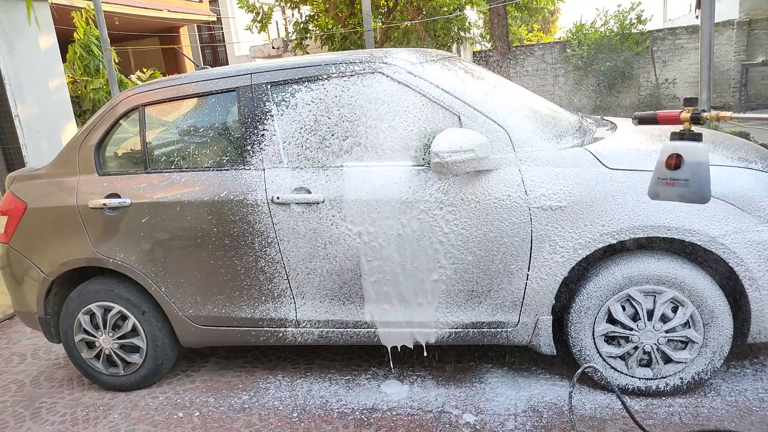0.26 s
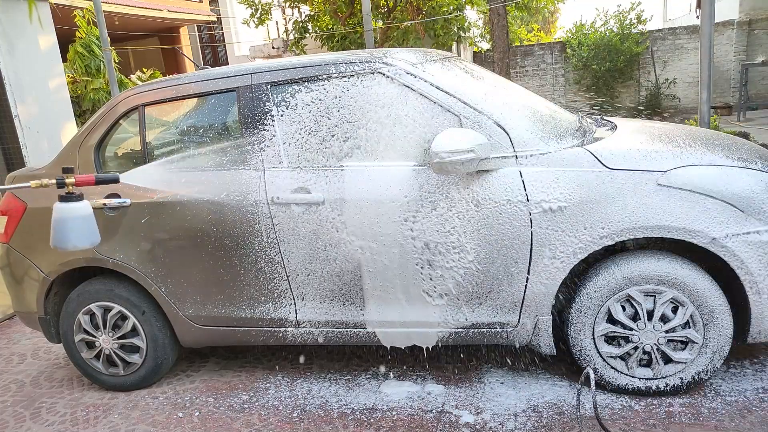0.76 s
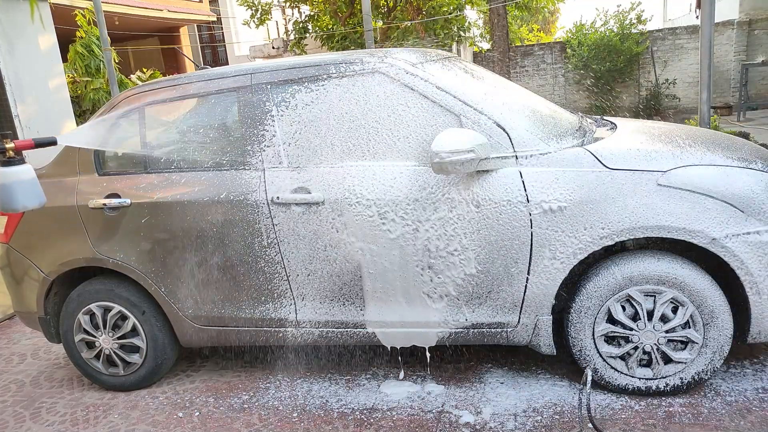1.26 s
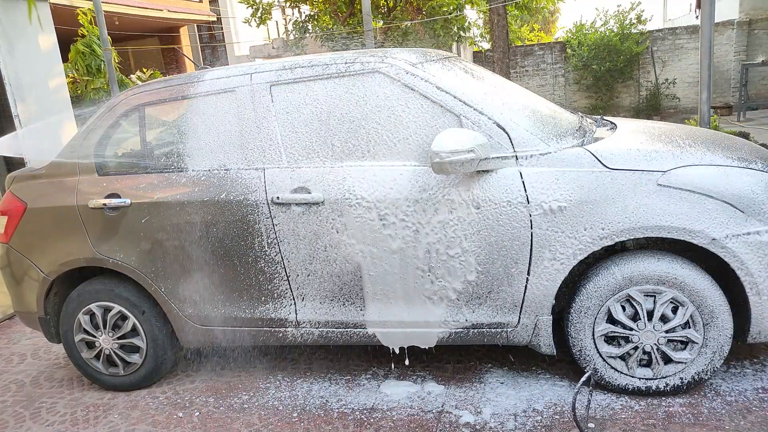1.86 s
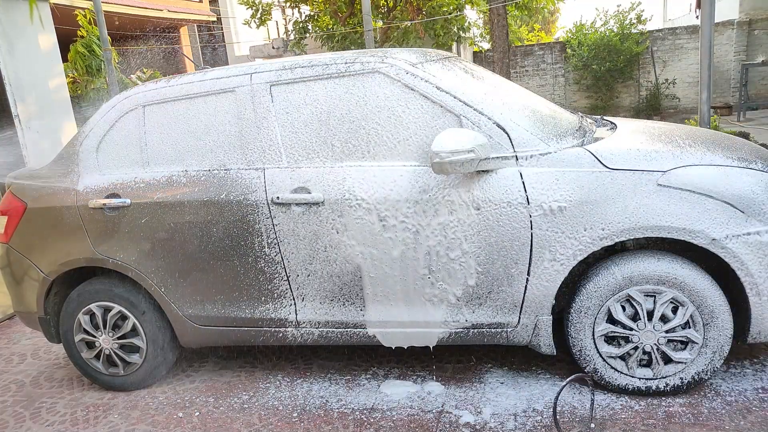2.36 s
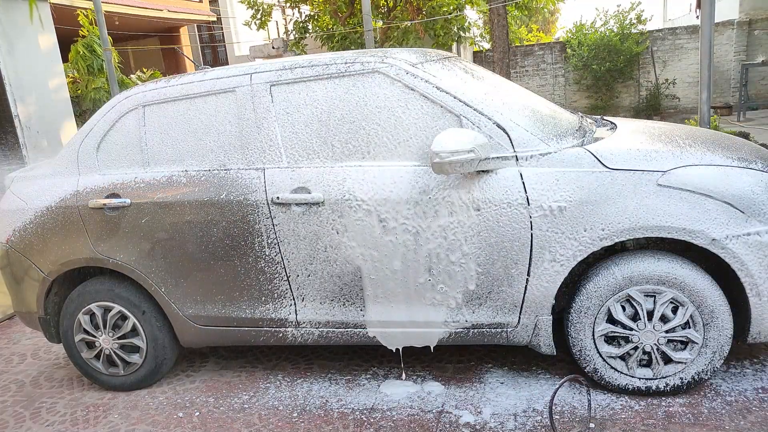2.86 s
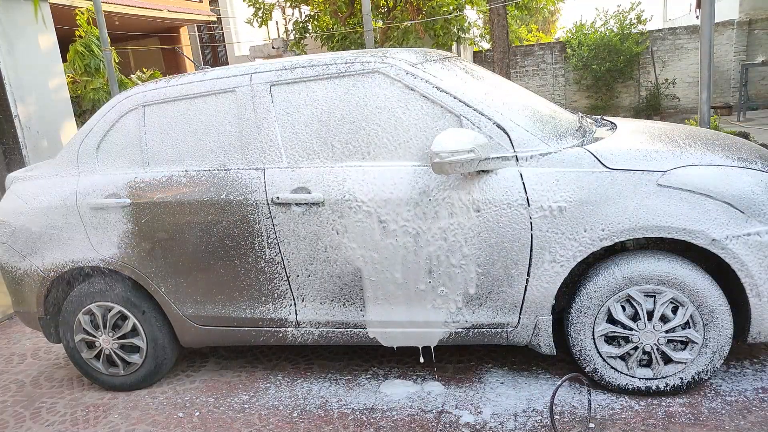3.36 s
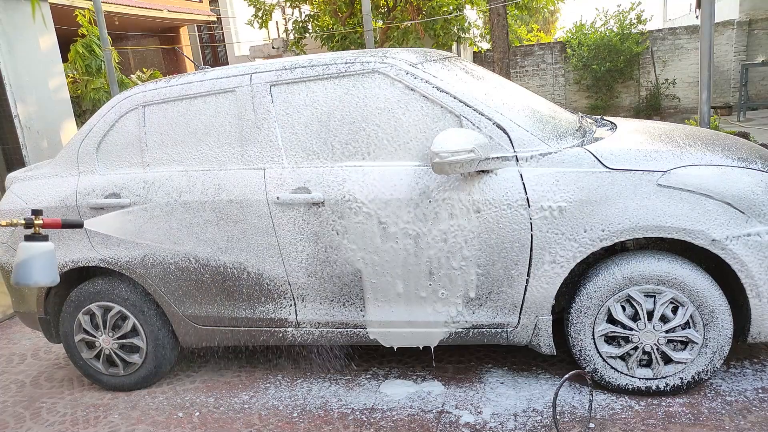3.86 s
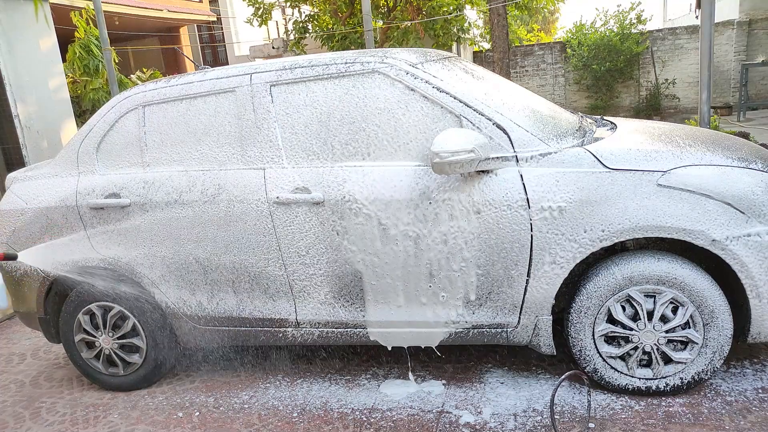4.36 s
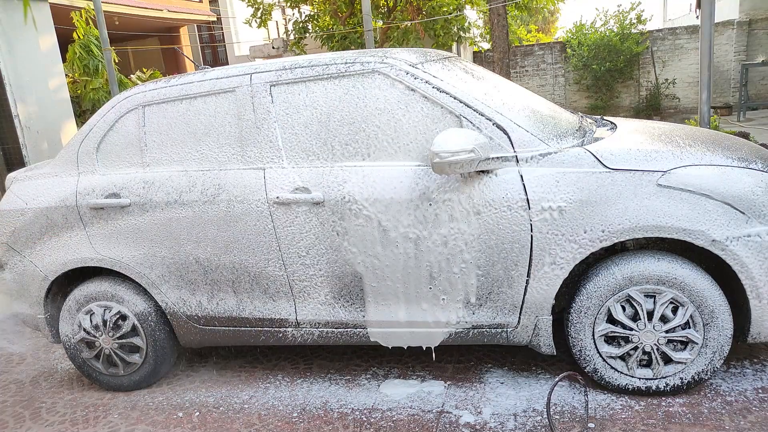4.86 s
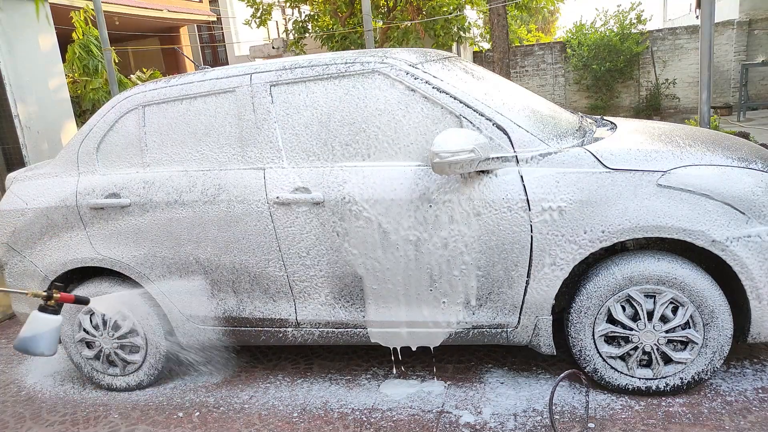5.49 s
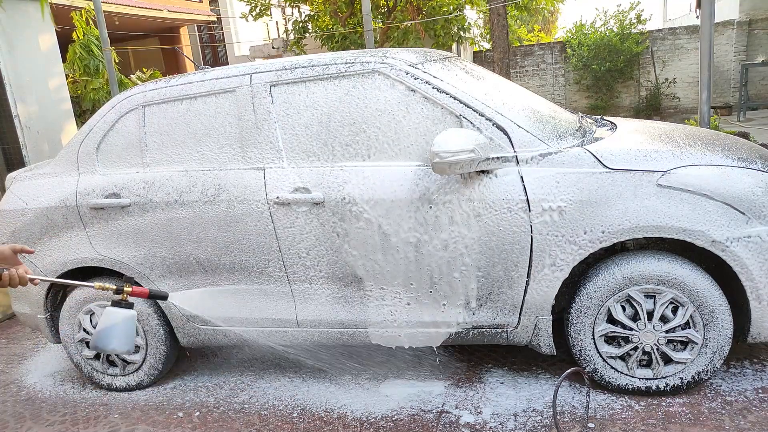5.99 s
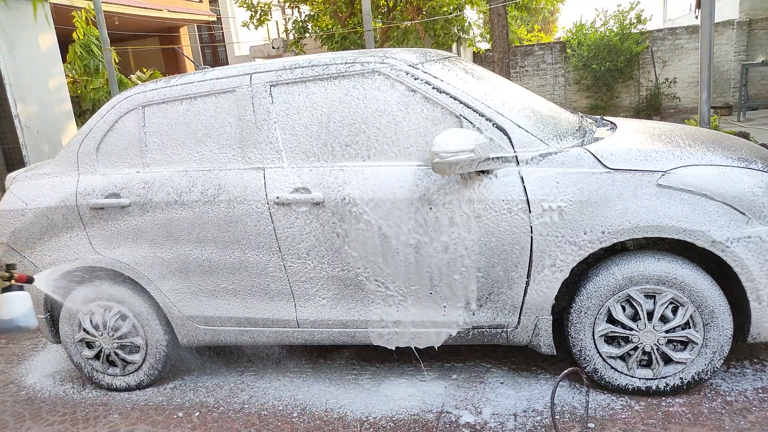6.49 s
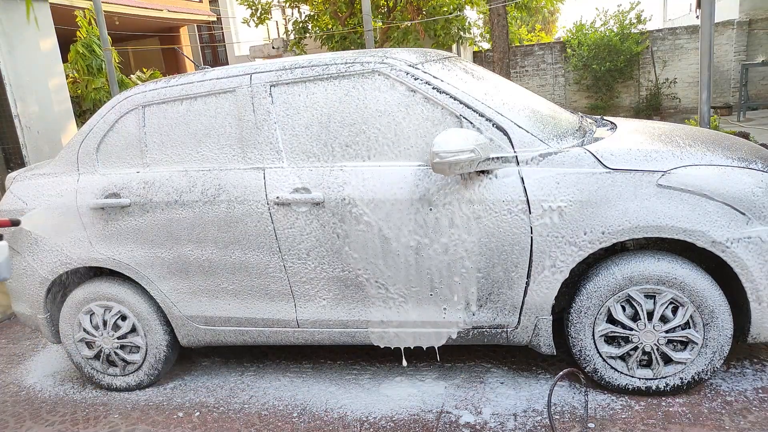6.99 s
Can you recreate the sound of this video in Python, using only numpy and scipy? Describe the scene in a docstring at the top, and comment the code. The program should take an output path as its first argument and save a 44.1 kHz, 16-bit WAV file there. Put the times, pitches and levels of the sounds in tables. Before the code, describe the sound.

A pressure washer sprays foam on a car with a loud, bright hiss, cutting out briefly at the start over whining motor noise

```python
"""Pressure washer spraying foam on a car

An electric washer sprays a car in a yard; early on the trigger is let go briefly, then squeezed again.
The jet is bands of noise that sputter, glide and echo off the car as the lance sweeps along the panels.
Random clicks make drops spatter on the car, and single hard drops ping as short tones.
The motor and pump whine as tones tied to the shaft, over housing noise, mains hum and a gusty yard.
"""
import sys
import numpy as np
from scipy import signal
from scipy.fft import rfft, irfft, next_fast_len
from scipy.io import wavfile
from scipy.ndimage import uniform_filter1d, map_coordinates

SR = 44100
rng = np.random.default_rng(int(sys.argv[2]) if len(sys.argv) > 2 else 0)


def master(y):
    """Save y as 16-bit WAV."""
    cut = np.clip(np.atleast_2d(y).T, -1, 1)
    pcm = np.round(cut * 32767)  # scale
    wavfile.write(sys.argv[1], SR, pcm.astype(np.int16))


N = 318843  # length in samples

# In every spectrum table, shape_db is only a shape: the noise is then scaled to rms 1.
# The slowly changing band levels are set before a small fixed trim where they are played.

# the running jet briefly surges, or dips where rise_db is negative: time_s, length_s, rise_db
SURGES_AND_DIPS = [(1.1, 0.052, -1), (3.33, 0.079, 1), (3.56, 0.074, 1.5), (4.0, 0.011, 2.5),
                   (4.35, 0.05, 1), (4.585, 0.0059, 2.5), (5.362, 0.0049, 3)]


def spray():
    """The turbulent jet sputters as air and soap mix, and its drops strike the car."""
    sputter = amp(0.45 * wobble(25) + 0.28 * wobble(140) + 0.28 * wobble(900))
    jet = jet_body() + resonances() + cavities() + sizzle()
    sound = jet * sputter + spatter()
    return notched(amp(swells(SURGES_AND_DIPS)) * sound, width_hz=440)


# shapes of the hollow, splash and hiss bands and of the dull roar: pitch_hz, shape_db (dB per Hz)
HOLLOW_SHAPE = [(500, -43.5), (900, -10.5), (1300, -18), (1470, -12.5), (1750, 3), (2000, 1.5),
                (2250, -15.5), (3000, -36.5)]
SPLASH_SHAPE = [(1200, -26), (2100, -1.5), (2600, 3.5), (3400, 4), (3900, 2), (5000, -21)]
HISS_SHAPE = [(2600, -27), (3300, -15), (3750, -6), (4050, -4), (4300, -1), (4550, -1), (4900, -2),
              (5250, -7), (6500, -33.5)]
ROAR_SHAPE = [(800, -12), (1000, 0), (1270, -3), (1550, 1.5), (2500, -2.5), (5000, -22.5)]
ROAR_DB = -38
# loudness of the splash band while the jet runs: time_s, level_db
SPLASH_LEVEL = [(0.5, -32.5), (0.62, -30), (1.71, -29.5), (2.46, -32.5), (2.87, -30.5), (3.11, -35),
                (3.22, -30.5), (3.5, -34), (3.65, -29), (4.36, -32.5), (4.92, -35), (5.48, -28.5),
                (5.7, -31), (5.82, -29), (6.12, -27.5), (6.82, -33), (7.2, -30.5)]
# the splash on the panels returns slowest; drops in flight keep splashing after the release
SPLASH_FILL_S, FLIGHT_S = 0.056, 0.039
HOLLOW_CENTRE_HZ, HISS_CENTRE_HZ = 1820, 4607


def jet_body():
    """Turbulent noise bands; longer waves pick up shifting reflections, while the roar stays plain."""
    hollow = jet_band(HOLLOW_SHAPE, hollow_level() - 2.0)
    hollow = shifted(hollow, low_pitch() - HOLLOW_CENTRE_HZ)
    splash_db = curves(SPLASH_LEVEL)[0] + valve(FOAM_LACK_DB, SPLASH_FILL_S, EMPTY_DB, FLIGHT_S)
    splash = jet_band(SPLASH_SHAPE, splash_db + 0.4)
    hiss = jet_band(HISS_SHAPE, hiss_level() - 1.0)
    hiss = shifted(hiss, high_ring_curves()[0] - HISS_CENTRE_HZ)
    roar = jet_band(ROAR_SHAPE, ROAR_DB + foam_flow())
    return reflected(hollow + splash + hiss, sway=0.03) + roar


def jet_band(spectrum, db):
    """One coloured noise band of the jet, its level unsteady like the turbulent flow."""
    return amp(db + 0.66 * wobble(18)) * noise(spectrum)


# loudness of the hollow band, which changes with the jet's aim: time_s, level_db
HOLLOW_LEVEL = [(0.04, -31), (0.12, -37), (0.5, -33.5), (0.53, -28), (0.95, -27), (1.43, -31.5),
                (2.08, -29), (2.14, -31.5), (2.33, -31.5), (2.35, -32), (3.19, -34.5), (3.99, -26.5),
                (4.03, -23), (4.05, -29.5), (4.38, -27), (4.49, -33.5), (4.88, -31.5), (4.97, -28),
                (5.08, -32.5), (5.43, -32), (5.58, -26), (5.84, -28), (6.25, -23.5), (6.26, -26.5),
                (6.6, -29), (6.81, -34), (6.84, -30), (7.2, -29.5)]


def hollow_level():
    """Hollow band level in dB, following the aim and the foamy flow."""
    return curves(HOLLOW_LEVEL)[0] + foam_flow()


# loudness of the hiss band: time_s, level_db
HISS_LEVEL = [(0.07, -24), (0.13, -27), (0.34, -24), (0.52, -24), (0.72, -29.5), (0.86, -24), (1.8, -22),
              (2.3, -24.5), (2.75, -32.5), (2.89, -27), (2.96, -24), (3.25, -22.5), (3.48, -22),
              (3.7, -21.5), (4.0, -20.5), (4.4, -20), (4.7, -22), (4.97, -26.5), (5.04, -21), (5.12, -25.5),
              (5.38, -22), (5.62, -27), (5.8, -25), (6.02, -24), (6.12, -29), (6.185, -30), (6.205, -20.5),
              (6.55, -22), (6.72, -21.5), (7.07, -20), (7.2, -21)]


def hiss_level():
    """Hiss band level in dB, following its table and the quickly recovering treble."""
    return curves(HISS_LEVEL)[0] + valve(TREBLE_LACK_DB, TREBLE_FILL_S, EMPTY_DB)


# loudness of the top sizzle as the lance is swept about: time_s, level_db
SIZZLE_LEVEL = [(0.5, -23.5), (0.78, -22.5), (0.89, -20), (0.95, -23), (1.04, -18), (1.94, -16),
                (2.78, -17.5), (2.81, -18.5), (2.89, -23), (3.02, -18.5), (3.82, -17.5), (3.99, -15.5),
                (4.55, -16), (4.59, -14.5), (4.64, -19.5), (5.09, -22.5), (5.22, -16.5), (5.33, -20.5),
                (5.37, -15), (5.39, -17), (5.72, -20), (5.76, -23), (6.04, -19.5), (6.1, -22), (6.28, -16),
                (6.6, -21.5), (6.99, -16.5), (7.2, -16.5)]
DRIBBLE_DB, MIST_S = -26.5, 0.016  # floor in the pause; extra time the fine mist sizzles


def sizzle_level():
    """Top sizzle level in dB; the mist lingers, then the flow sinks to a dribble."""
    return curves(SIZZLE_LEVEL)[0] + valve(TREBLE_LACK_DB, TREBLE_FILL_S, DRIBBLE_DB, MIST_S)


# the low resonance as the lance turns: time_s, pitch_hz
LOW_RING = [(0.05, 1880), (0.5, 1800), (0.95, 1810), (1.5, 1845), (2.1, 1875), (2.6, 1900), (3.8, 1820),
            (4.45, 1845), (5, 1715), (5.3, 1820), (5.65, 1790), (6.05, 1750), (6.25, 1790), (6.55, 1830),
            (7.2, 1835)]


def low_pitch():
    """Pitch of the jet's low resonance in Hz, which also carries the hollow band."""
    return curves(LOW_RING)[0]


# the high resonance follows the aim: time_s, pitch_hz, level_db (relative to the hiss)
HIGH_RING = [(0.45, 4580, -10.5), (0.75, 4720, -7), (1.05, 4563, -7), (1.8, 4845, -6), (2.2, 4879, -12),
             (2.55, 5000, -10), (2.85, 4877, -19), (2.97, 4536, 1), (3.2, 4520, -14), (3.6, 4703, -7.5),
             (4.05, 4597, -5.5), (4.36, 4728, -12), (4.72, 4510, -11), (4.95, 4670, -6.5), (5.4, 4617, -8),
             (5.65, 4528, 1), (5.8, 4546, -3.5), (6.03, 4550, -2), (6.3, 4560, -1), (6.63, 4497, -6),
             (7.2, 4523, -4)]


def high_ring_curves():
    """Pitch in Hz, which also carries the hiss band, and relative level in dB of the high resonance."""
    return curves(HIGH_RING)


WANDER_HZ = 40.2  # scale of the high resonance's random drift


def resonances():
    """Turbulence excites two narrow, gliding resonances with random strength and phase."""
    high_hz, whistle_db = high_ring_curves()
    low_db = hollow_level() - 6.0 + 2.3 * wobble(16)
    high_db = hiss_level() + whistle_db - 4.5 + 1.8 * wobble(15)
    low = amp(low_db) * ring(low_pitch(), flutter=100)
    high = amp(high_db) * ring(high_hz + WANDER_HZ * wobble(9), flutter=400)
    return low + high


# recesses of the doors and the wheel ring: start_s, end_s, first_hz, last_hz, level_db (mid-pass)
CAVITIES = [(0.387, 1.1, 1490, 1480, -39), (0.523, 0.78, 2600, 2610, -36), (1.031, 1.165, 3780, 3890, -25),
            (1.212, 1.487, 1420, 1440, -43), (1.721, 1.864, 4990, 4890, -27.5),
            (2.547, 2.719, 3380, 3210, -37), (2.68, 3.0, 2844, 2830, -36),
            (2.938, 3.199, 4500, 4540, -30.5), (3.215, 3.396, 4050, 3920, -30),
            (3.461, 3.583, 4950, 4900, -27.5), (4.301, 4.418, 4860, 4900, -26.5),
            (5.468, 5.717, 1610, 1550, -39.5), (5.86, 6.187, 2740, 2510, -32),
            (5.96, 6.238, 1640, 1640, -35.5), (6.198, 6.278, 4420, 4460, -27),
            (6.748, 6.95, 3800, 3810, -35), (7.0, 7.16, 4400, 4450, -26)]


def cavities():
    """Recesses of the car ring while the jet plays on them, rising and fading as it passes."""
    t = np.arange(N) / SR
    sound = np.zeros(N)
    for start, end, first_hz, last_hz, db in CAVITIES:
        u = np.clip((t - start) / (end - start), 0, 1)
        swell = 2 * np.sqrt(u * (1 - u))
        sound += amp(db) * swell * ring(first_hz + u * (last_hz - first_hz), flutter=120)
    return sound


# shape of the top sizzle: pitch_hz, shape_db (dB per Hz)
SIZZLE_SHAPE = [(4000, -18.5), (5200, -9.5), (5800, -1), (6300, 3), (6900, 2), (7400, -2.5), (7750, -8.5),
                (8000, -26.5), (8300, -24.5), (8550, -57.5)]
BRIGHTEN_HZ_PER_DB = 14


def sizzle():
    """The finest spray comes from the whole fan; its noise slides up in pitch as it grows louder."""
    level_db = sizzle_level()
    band = jet_band(SIZZLE_SHAPE, level_db - 0.8 + 0.66 * wobble(50) + 0.5 * wobble(400))
    louder_db = np.clip(level_db - np.median(level_db), -6, 6)
    return shifted(band, BRIGHTEN_HZ_PER_DB * louder_db)


# drops striking the car and the wheel: time_s, level_db (relative to the top sizzle)
SPATTER = [(1, -19.5), (2, -9.5), (3.1, -19.5), (4.3, -11), (7.2, -15.5)]


def spatter():
    """Many random drop impacts, coloured like short bright taps on the car."""
    impacts = coloured(drops(rate=1100, spread_db=8.5), [
        (1500, -31.0), (3000, -16.0), (4500, -4.5), (5400, -19.0),
        (6500, 7.5), (7400, -6.0), (8000, -7.5), (8500, -44.0)])
    return amp(sizzle_level() - 1.5 + curves(SPATTER)[0]) * impacts


def drops(rate, spread_db):
    """Random impacts, rate a second, most small and a few large, at rms 1."""
    at, chance, sign = rng.random((3, int(rate * N / SR)))
    size = amp(spread_db * np.minimum(-np.log(1 - chance), 3.3))
    return unit(np.bincount((at * N).astype(int), size * np.sign(sign - 0.5), N))


# echo paths stretch and shrink as the lance is swept: time_s, delay_factor
SWEEP = [(0, 0.97), (1.3, 1.04), (2.7, 0.95), (3.1, 0.93), (3.9, 1.033), (4.8, 0.85), (5.3, 0.97),
         (6.1, 1.015), (7.2, 1.024)]
# delays before the sweep, scale of the nearest echo's gain, and how gain falls with delay (power)
ECHO_FIRST_MS, ECHO_LAST_MS, ECHO_GAIN, ECHO_FALL = 1.7, 13, 0.36, 0.2


def reflected(x, sway):
    """Panels and ground scatter echoes that come and go; delays follow the sweep and hand tremor."""
    n, (stretch,) = np.arange(N), curves(SWEEP)
    out = x.copy()
    for ms in np.geomspace(ECHO_FIRST_MS, ECHO_LAST_MS, 18):
        delay = ms * stretch * (1 + sway * wobble(1.5)) * SR / 1000
        gain = ECHO_GAIN * (ECHO_FIRST_MS / ms) ** ECHO_FALL * wobble(6)
        out += gain * np.interp(n - delay, n, x, left=0)

    def power(v):
        return np.abs(uniform_filter1d(v * v, size=2048)) + 1e-12

    # keep the loudness of the direct sound, so echoes change only the colour
    return out * np.sqrt(power(x) / power(out))


# surfaces that cancel a gliding band: start_s, end_s, first_hz, last_hz, depth_db (mid-pass)
PASSES = [(0.0, 0.3, 2880, 3150, 6.5), (0.303, 0.58, 3120, 3300, 6), (0.6, 0.955, 3720, 3880, 1.5),
          (1.366, 2.05, 4340, 4200, 3), (2.2, 2.7, 3730, 4100, 1.5), (2.3, 2.928, 5330, 5540, 3.5),
          (2.62, 2.92, 4300, 4900, 4), (4.75, 5.05, 3360, 3700, 3), (5.397, 5.667, 4370, 3640, 5),
          (5.69, 5.796, 3500, 2450, 5), (5.848, 6.02, 3800, 3650, 9.5), (5.974, 6.11, 3350, 2900, 13),
          (6.07, 6.21, 3400, 4100, 0.5)]


def notched(x, width_hz):
    """Interference cuts a gliding dip into the spectrum; it deepens and fades with each pass."""
    hz, t, z = signal.stft(x, SR, nperseg=512)
    dip = np.zeros(z.shape)
    for start, end, first_hz, last_hz, depth in PASSES:
        u = np.clip((t - start) / (end - start), 0, 1)
        centre = first_hz + u * (last_hz - first_hz)
        shape = np.exp(-((hz[:, None] - centre) / width_hz) ** 2)
        dip += depth * 2 * np.sqrt(u * (1 - u)) * shape
    return signal.istft(z * amp(-dip), SR, nperseg=512)[1][:N]


# the trigger is let go, and the valve snaps open again
RELEASE_S, SQUEEZE_S = 0.08, 0.338
# the jet starts louder, close by; it drops as the valve shuts, then dies away as the hose empties
CLOSE_BY_DB, SHUT_DROP_DB, SHUT_TAU_S, DRAIN_DB_PER_S = 4.5, 5.5, 0.013, 139.5
# after the squeeze the treble recovers quickly, the foamy lower bands slowly
TREBLE_LACK_DB, TREBLE_FILL_S = 16.5, 0.037
FOAM_LACK_DB, FOAM_FILL_S = 12.5, 0.055
EMPTY_DB = -32  # floor of the body bands in the pause


def valve(lack_db, fill_s, rest_db, linger_s=0):
    """Flow in dB: it drains after the release and builds up again after the squeeze."""
    t = np.arange(N) / SR
    shut = np.maximum(t - RELEASE_S, 0)
    first_drop = SHUT_DROP_DB * (1 - np.exp(-shut / SHUT_TAU_S))
    draining = CLOSE_BY_DB - first_drop - DRAIN_DB_PER_S * np.maximum(shut - linger_s, 0)
    filling = -lack_db * np.exp(-(np.maximum(t - SQUEEZE_S, 0) / fill_s) ** 2)
    return np.where(t < SQUEEZE_S, np.maximum(draining, rest_db), filling)


def foam_flow():
    """Flow in dB for the foamy lower bands, which refill slowly."""
    return valve(FOAM_LACK_DB, FOAM_FILL_S, EMPTY_DB)


# single hard drops near the microphone: time_s, level_db (before the treble cut)
HARD_DROPS = [(1.9190, -10), (2.6324, -12), (2.8436, -9), (3.9279, -11), (4.0072, -11), (4.4560, -10),
              (4.4992, 2.0), (5.3597, -9), (5.5398, -10), (5.6281, -9), (5.6570, -7)]
DROP_HZ, DROP_TOP_HZ, DROP_RISE_S = 6600, 8000, 0.00025  # pitch, upper edge, rise time


def hard_drops():
    """Each hard drop is a very short, bright ping that rises at once and dies away."""
    sound = np.zeros(N)
    for s, db in HARD_DROPS:
        since = since_start(s)
        u = since / DROP_RISE_S
        sound += amp(db) * u * np.exp(1 - u) * np.sin(2 * np.pi * DROP_HZ * since)
    return filtered(sound, lambda hz: 1 / (1 + (hz / DROP_TOP_HZ) ** 60))


# the valve spits as it closes and as it opens: time_s, level_db (at its start), fall_s (by 60 dB)
SPITS = [(0.122, -31, 0.09), (0.146, -28, 0.09), (0.339, -28.5, 0.1), (0.374, -29.5, 0.08)]


def valve_spits():
    """The closing or opening valve spits bursts of noise that die away."""
    envelope = np.zeros(N)
    for s, db, t60 in SPITS:
        since = since_start(s)
        envelope += (since > 0) * amp(db - 60 * since / t60)
    return envelope * noise([
        (600, -1.5), (1200, -20), (1900, -5.5), (3200, -16.0), (4200, -3.5),
        (4800, 2.5), (5500, -3.5), (7000, -0.5), (7700, -6.5), (8400, -35.5)])


# the pump groans and knocks: start_s, length_s, level_db (peak), first_hz, last_hz
GROANS = [(-0.02, 0.13, -37, 695, 680), (0.11, 0.1, -41, 690, 680), (0.135, 0.035, -40, 1020, 1000),
          (0.138, 0.03, -43, 200, 130), (0.18, 0.04, -37, 55, 55), (0.265, 0.06, -50, 715, 725),
          (0.31, 0.04, -46, 1880, 1850), (0.337, 0.042, -33, 812, 808), (0.34, 0.08, -37, 645, 660),
          (0.348, 0.075, -43, 260, 480), (0.408, 0.035, -37, 1000, 1000)]


def pump_groans():
    """Pressure changes make the pump groan: rough tones that glide, swell and fade."""
    groans = np.zeros(N)
    for s, length, db, first_hz, last_hz in GROANS:
        u = np.minimum(since_start(s) / length, 1)
        angle = 2 * np.pi * np.cumsum(first_hz + u * (last_hz - first_hz)) / SR
        groans += amp(db) * np.sin(np.pi * u) * np.sin(angle + 0.8 * wobble(110))
    return groans


# the motor coasts while the trigger is released: time_s, speed_share, level_db
MOTOR = [(0, 1, -1), (0.11, 0.995, -2), (0.16, 0.98, -7), (0.21, 0.95, -13), (0.255, 0.91, -14),
         (0.29, 0.89, -14), (0.325, 0.88, -14), (0.35, 1.01, -4), (0.42, 1.005, -2), (0.55, 1, 0)]
# tones of motor and pump: shaft_multiple, level_db (rms at full load, before wavering)
WHINE = [(3, -61.5), (5, -62), (6, -57.5), (8, -65), (9, -63.5), (13, -49.5), (15, -57), (16, -47),
         (17, -39), (18, -52), (19, -65.5), (20, -51)]
# mains hum and pump throb: pitch_hz, level_db (rms at full load, before swells and wavering)
HUM = [(72.6, -57), (100.4, -56), (300, -61.5)]
# the low hum swells: time_s, length_s, rise_db
HUM_SWELLS = [(1.9, 0.28, 6.5)]
# rough buzzes between the shaft tones: pitch_hz (at full speed), level_db (rms at full load)
BUZZ = [(630, -53.5), (695, -50.5), (785, -53), (835, -52), (935, -52)]
# rush of the motor's fan and housing: pitch_hz, shape_db (dB per Hz)
HOUSING = [(60, -7.5), (130, -11), (280, -8), (480, -13), (560, -8), (620, 0.5), (680, -1.5), (800, -0.5),
           (1000, -9), (1200, -8.5), (2500, -14.5), (6000, -28.5)]
SHAFT_HZ = 47.46  # turns a second at full speed, before a slight random drift
UNLOADED_FADE = 0.7  # extra dB the shaft tones sink for each dB of the motor's level


def washer():
    """Shaft tones, hum and buzz over the housing's rush, which beats once in every turn."""
    t = np.arange(N) / SR
    speed, level_db = curves(MOTOR)
    angle = 2 * np.pi * np.cumsum(SHAFT_HZ * speed * (1 + 0.00076 * wobble(6.61))) / SR

    # the tones stay roughly in step, and the weaker ones waver more than the main whine
    loudest = max(db for order, db in WHINE)
    whine = np.zeros(N)
    for order, db in WHINE:
        tone = np.cos(order * angle + 0.44 * wobble(4))
        whine += amp(db + 0.2 * (loudest - db) * wobble(14)) * tone

    hum = np.zeros(N)
    swell_db = swells(HUM_SWELLS)
    for hz, db in HUM:
        tone = np.sin(2 * np.pi * hz * t + 0.5 * wobble(3.5))
        hum += amp(db + swell_db + 1.5 * wobble(2.7)) * tone

    buzz = sum(amp(db) * ring(hz * speed, flutter=35) for hz, db in BUZZ)
    beat = 1 + 0.14 * np.cos(angle)
    rush = noise(HOUSING) * beat * amp(-40.0 + 0.6 * wobble(45))
    load = amp(UNLOADED_FADE * level_db)
    tones = np.sqrt(2) * (load * whine + hum)  # root two turns rms into peak
    return amp(level_db) * (tones + rush + buzz)


# outdoor background: pitch_hz, shape_db (dB per Hz)
YARD_SHAPE = [(20, -8.5), (80, -1.5), (200, -8.5), (700, -4), (1500, -14.5), (4000, -21), (8000, -32.5)]
# gusts on top of the steady draught: time_s, length_s, rise_db
GUSTS = [(0.45, 0.3, 6.9), (1.33, 0.24, 7.4), (3.45, 0.2, 5.7), (5.25, 1, 9.9)]
DRAUGHT_DB = -57  # between gusts


def yard():
    """A distant outdoor rush, and air moving past the microphone as a low, gusty rumble."""
    rush = amp(-50.0) * noise(YARD_SHAPE)
    air = noise([(18, 0.0), (32, -4.0), (50, -7.0), (90, -30.5)])
    return rush + amp(DRAUGHT_DB + swells(GUSTS)) * air


def amp(db):
    """Decibels to gain."""
    return 10 ** (np.asarray(db) / 20)


def unit(x):
    """Scale to rms 1."""
    return x / np.sqrt(np.mean(x ** 2) + 1e-20)


def since_start(s):
    """Seconds since time s, zero before it."""
    return np.maximum(np.arange(N) / SR - s, 0)


def curves(rows):
    """One value per sample for each column after the time."""
    s, *cols = np.transpose(rows)
    return [np.interp(np.arange(N) / SR, s, c) for c in cols]


def swells(rows):
    """Bell-shaped rises in dB from (time, length, rise) rows; a negative rise is a dip."""
    t = np.arange(N) / SR
    return sum(db * np.exp(-((t - s) / length) ** 2) for s, length, db in rows)


def wobble(rate):
    """A smooth random curve, rate knots a second."""
    knots = rng.standard_normal(8192)
    n = np.arange(N)
    coarse = n[::8]  # every eighth sample is fine enough
    return np.interp(n, coarse, map_coordinates(knots, [coarse * rate / SR], mode="wrap"))


def filtered(x, response):
    """x times a response of frequency."""
    m = next_fast_len(N + 8192)
    return irfft(rfft(x, m) * response(np.fft.rfftfreq(m, 1 / SR)), m)[:N]


def coloured(x, spectrum):
    """x shaped by (Hz, dB) points that fall away beyond their ends, at rms 1."""
    f, db = np.transpose(spectrum)
    f = np.r_[f[0] / 2, f, f[-1] * 2]
    db = np.r_[db[0] - 40, db, db[-1] - 40]

    def response(hz):
        return amp(np.interp(np.log(hz + 1), np.log(f), db, left=-120, right=-120))

    return unit(filtered(x, response))


def noise(spectrum):
    """Coloured noise of rms 1."""
    return coloured(rng.standard_normal(N), spectrum)


def ring(hz, flutter):
    """Turbulence in a narrow resonance: a tone of random strength and phase, rms 1."""
    angle = 2 * np.pi * np.cumsum(hz) / SR
    return unit(wobble(flutter) * np.cos(angle) + wobble(flutter) * np.sin(angle))


def shifted(x, hz):
    """Slide a band up or down by a moving number of Hz."""
    band = signal.hilbert(x, next_fast_len(N))[:N]
    return np.real(band * np.exp(2j * np.pi * np.cumsum(hz) / SR))


def scene():
    """Everything at one microphone."""
    return (spray() + hard_drops() + valve_spits() + pump_groans() + washer() + yard())[None]


INPUT_TOP_HZ, TOP_HZ = 8600, 15700  # treble limits before and after clipping


def record(dry):
    """The input is band-limited, peaks beyond full scale are clipped, and the top is cut again."""
    held = np.clip(filtered(dry[0], lambda hz: hz < INPUT_TOP_HZ), -1, 1)
    return filtered(held, lambda hz: hz < TOP_HZ)[None]


dry = scene()
out = record(dry)
master(out)
```